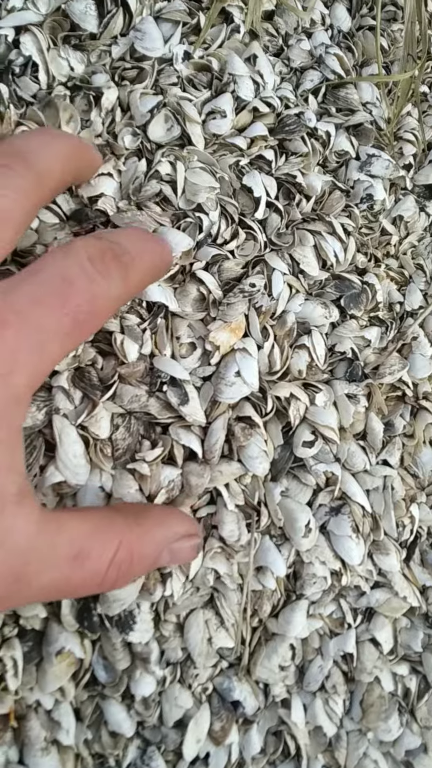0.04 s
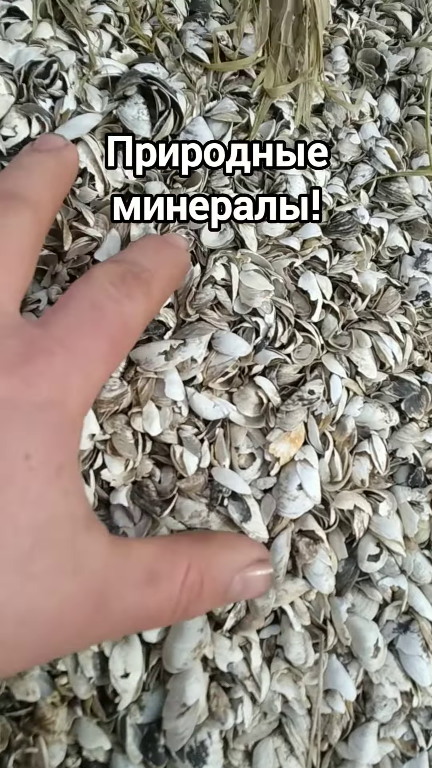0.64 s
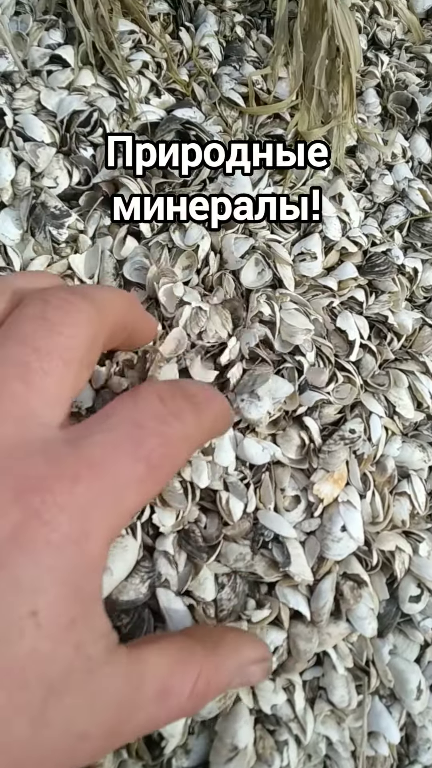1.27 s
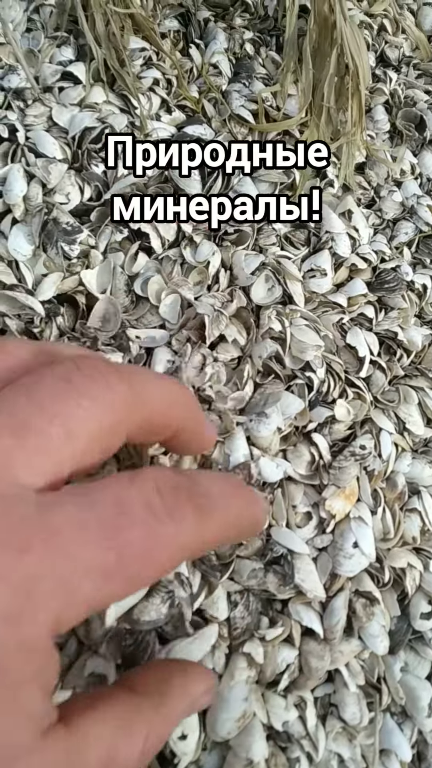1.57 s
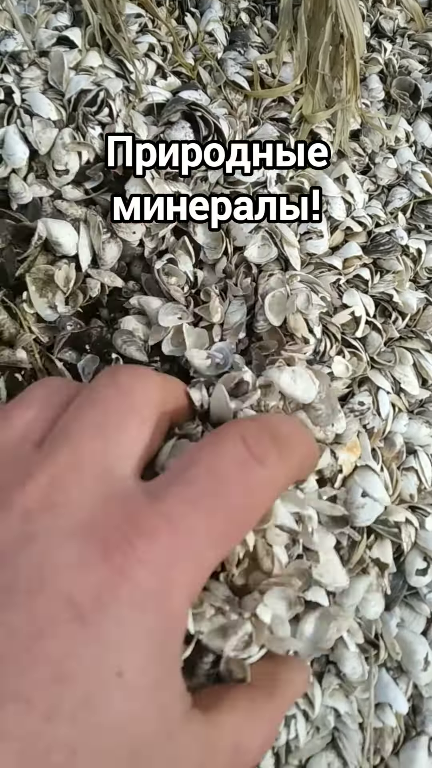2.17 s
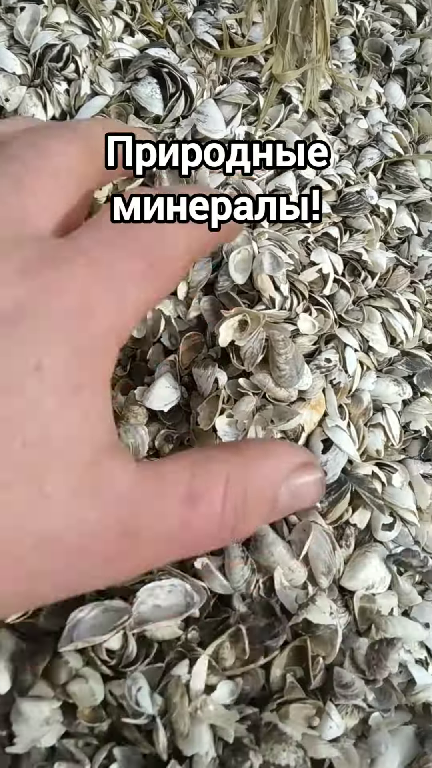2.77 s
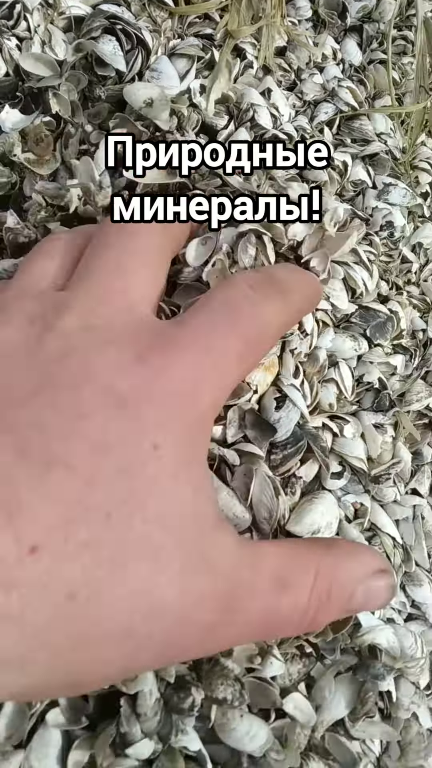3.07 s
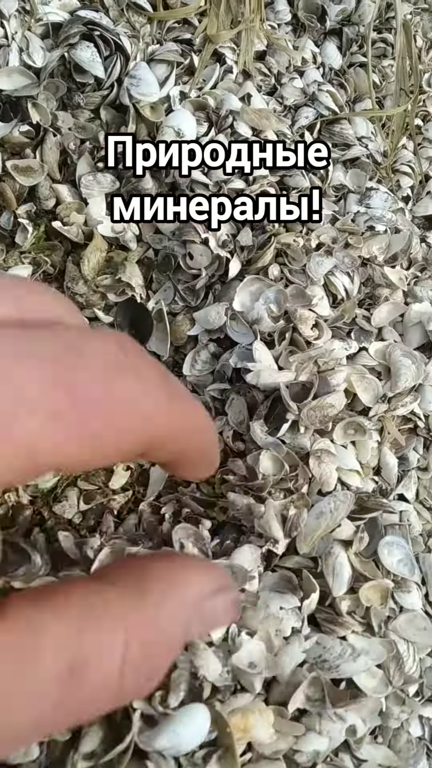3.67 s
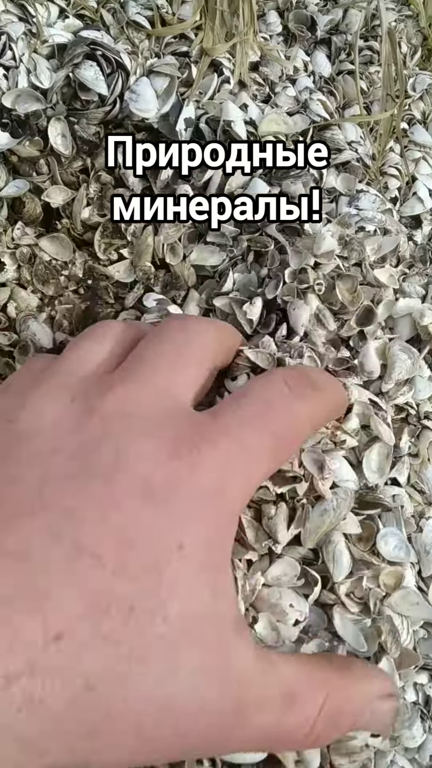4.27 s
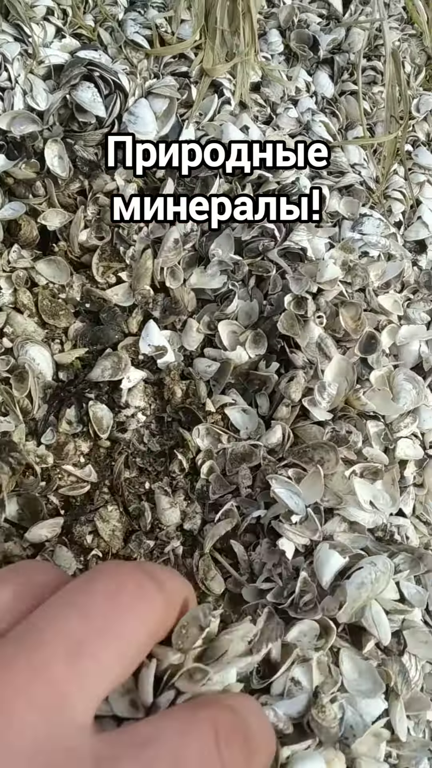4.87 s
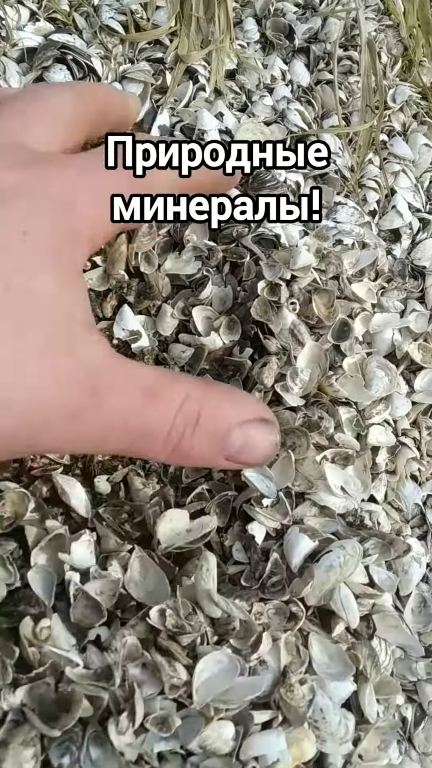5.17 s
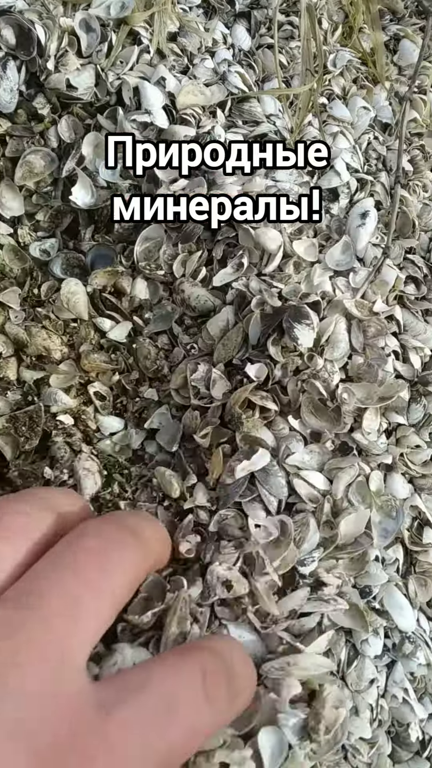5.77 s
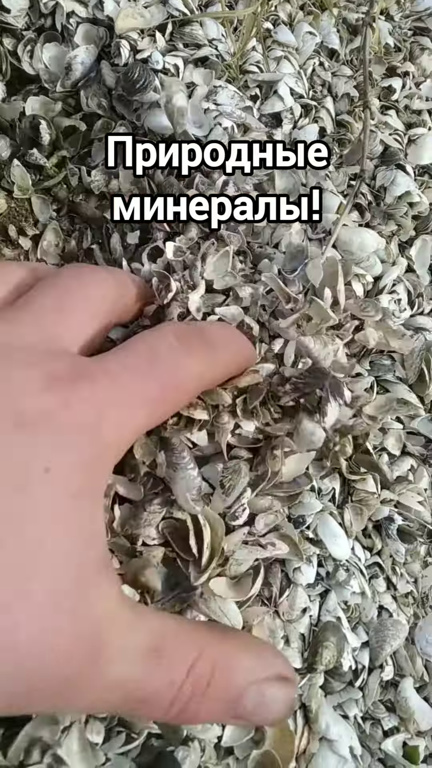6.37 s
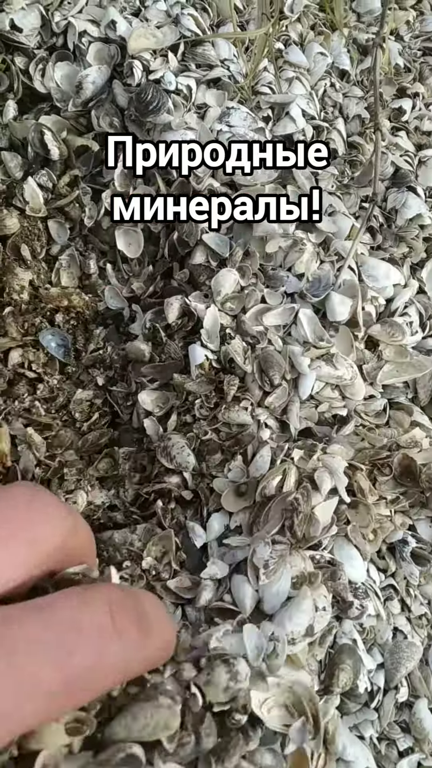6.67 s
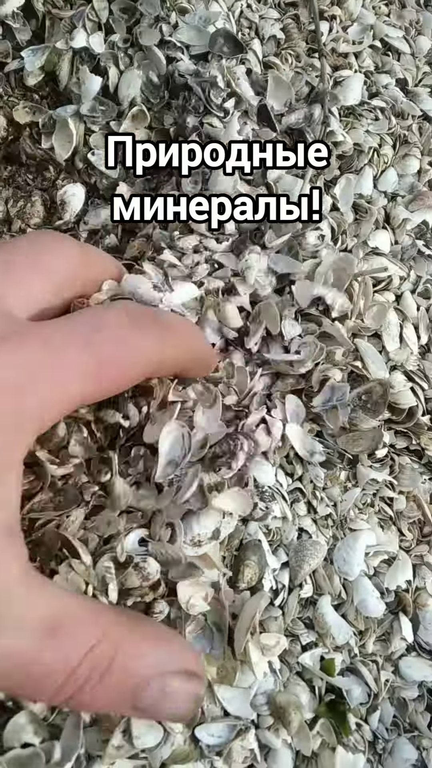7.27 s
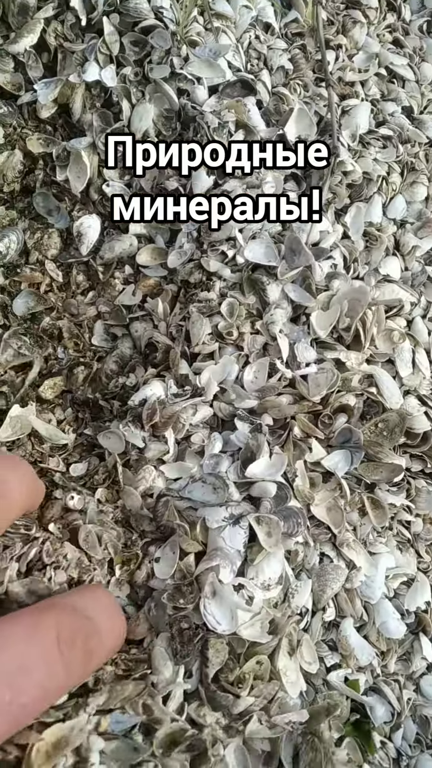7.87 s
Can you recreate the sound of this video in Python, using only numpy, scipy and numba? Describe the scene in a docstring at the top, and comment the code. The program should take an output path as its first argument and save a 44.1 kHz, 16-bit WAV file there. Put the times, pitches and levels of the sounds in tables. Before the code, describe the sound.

A hand rakes repeatedly through small dry shells, making a bright, close rattle and crunch, with a light breeze on the microphone.

```python
"""A bright, dry rattle: a hand rakes again and again through a bank of small shells, just under a phone.
Each stroke bites in, eases off and leaves a spill, ending towards the left microphone. Thousands of tiny
contacts ring the thin shells; a few snap loudly, hollow ones knock, the bed crunches as fingers dig in.
We are outdoors: a light breeze rumbles on the microphone ports, over a faint low hum and open air."""
import sys
import numpy as np
from scipy import signal
from scipy.fft import rfft, irfft
from scipy.io import wavfile
from scipy.ndimage import uniform_filter1d
from numba import njit

SR = 44100
rng = np.random.default_rng(int(sys.argv[2]) if len(sys.argv) > 2 else 0)


def log_audio(samples):
    """Write samples as a 16-bit WAV file to the path given in sys.argv[1]."""
    # one column per channel
    frames = np.atleast_2d(samples).T
    # limit to full scale, then quantise
    limited = np.clip(frames, -1, 1)
    pcm = np.round(limited * 32767).astype(np.int16)
    wavfile.write(sys.argv[1], SR, pcm)


N = 358974

# Strokes just under the phone. Levels, flow and pan are nominal: each layer scales them. +pan is left.
# start_s, length_s, dug_in_s, rattle_db, drift_db_per_s, clatter_db, bed_db, spill_db, flow_per_s,
# draw_left_s, pan_from_db, pan_to_db
STROKES = [(-0.02, .315, 0.38, -33, -17.5, -40.5, -58.5, -50, 2400, 0.44, 4.5, 17),
           (0.524, 1.13, 1.04, -38, 5, -39.5, -55, -47, 1600, 1.02, 0.5, 5.2),
           (1.768, 1.0, 0.4, -24, -7.5, -34, -51.5, -35, 8000, 0.89, 0.5, 12.8),
           (2.913, .875, 0.5, -21.5, -10, -38.5, -51, -34, 8500, 0.73, 0, 16),
           (3.937, .44, 0.4, -19, -28.5, -35, -48.5, -35, 8000, 0.34, 0.5, 3.2),
           (4.40, .72, 0.35, -30, 2.5, -37, -50.5, -31, 6500, 0.51, 4, 12.6),
           (5.186, .87, 0.57, -23.5, -4.5, -35, -49, -31, 8000, 0.752, 0.5, 11.2),
           (6.187, .615, 0.46, -22.5, -11.5, -33.5, -48, -30, 8500, 0.52, -0.5, 14.7),
           (7.05, .765, 0.46, -24, -3, -35.5, -45, -30, 8500, 0.68, 1.5, 9.2),
           (7.814, .33, 0.4, -36.5, 17, -40, -52.5, -33, 4500, 0.21, 7.5, 7.4)]
# Clumps giving way around the hand: start_s, length_s, rattle_db, clatter_db
SLIDES = [(0.109, .035, -35, -57.5), (0.152, 0.047, -36.5, -64), (0.312, .16, -49, -47.5),
          (0.475, .05, -38, -43), (0.537, .025, -37, -50), (0.62, .08, -32, -41), (0.7, .07, -33.5, -43),
          (0.858, .13, -30.5, -46), (0.905, .03, -28, -36), (1.004, 0.05, -26, -37),
          (1.054, 0.074, -29.5, -59), (1.166, 0.027, -27.5, -34), (1.212, .05, -27, -39),
          (1.27, 0.036, -27, -37), (1.394, .06, -32.5, -38), (1.439, .04, -31, -45),
          (1.474, .045, -23.5, -47), (1.533, 0.056, -31, -57), (1.767, .03, -29, -39),
          (1.858, 0.077, -21, -41), (2.014, .06, -22, -31.5), (2.096, 0.077, -25, -34),
          (2.442, .22, -27.5, -61), (2.511, 0.067, -24.5, -60), (2.687, .07, -31.5, -62),
          (2.82, .05, -30.5, -48), (2.862, .07, -36, -44), (2.912, .025, -30, -29), (2.98, 0.04, -24, -29),
          (3.05, 0.12, -25, -34), (3.367, 0.11, -27.5, -41), (3.558, 0.07, -30, -42),
          (3.841, 0.12, -34, -42.5), (4.09, 0.027, -22.5, -38), (4.27, 0.045, -27, -47),
          (4.646, .075, -28, -49), (4.727, 0.088, -24.5, -35), (4.805, .09, -26.5, -50),
          (5.017, 0.066, -28.5, -55), (5.146, 0.07, -31, -59), (5.217, 0.1, -23.5, -41),
          (5.374, 0.073, -28, -39), (5.534, 0.075, -30, -34), (5.731, 0.16, -26.5, -37),
          (5.987, 0.063, -33.5, -53), (6.127, .07, -27, -39.5), (6.227, 0.11, -23.5, -30),
          (6.458, 0.2, -27.5, -33.5), (6.853, .06, -30.5, -37), (6.935, .14, -33, -39.5),
          (7.118, 0.13, -26, -33.5), (7.296, 0.17, -29, -35.5), (7.706, 0.17, -27.5, -46),
          (7.882, 0.075, -25, -52), (8.01, 0.055, -24.5, -44), (8.111, .04, -26, -42)]
def hand(bite_s=.05, settle_s=.025, lift_s=.1, spill_s=.45, ease_db_per_s=5.5):
    """Strokes bite in, ease off, lift and leave a spill. Gives three layer levels (dB), flow and pan."""
    t, along = np.arange(N) / SR, np.linspace(0, 1, 12)
    slides = swells([(s, length, db) for s, length, db, _ in SLIDES], rise_s=.015, fall_s=.04)
    clatter = swells([(s, length, db) for s, length, _, db in SLIDES], rise_s=.015, fall_s=.04)
    rattle, bed, path = slides + undb(-49) ** 2, 0, []
    flow = 500 + 2000 * np.sqrt(slides) / undb(-28)
    for (start, length, dug_s, rattle_db, drift, clatter_db, bed_db, spill_db,
         rate, draw_s, from_db, to_db) in STROKES:
        age, after = np.clip(t - start, 0, length), np.maximum(t - start - length, 0)
        moving = np.minimum(age / bite_s, 1) * np.exp(-np.minimum(after, 1) / settle_s)
        buried = moving * np.exp(-np.maximum(age - dug_s, 0) / lift_s) * undb(-ease_db_per_s * age)
        # shells trickle back into the furrow
        spill = undb(spill_db) * np.minimum(after / settle_s, 1) * np.exp(-after / spill_s)
        rattle = rattle + (moving * undb(rattle_db + drift * age)) ** 2 + spill ** 2
        clatter = clatter + (buried * undb(clatter_db)) ** 2
        bed = bed + (buried * undb(bed_db)) ** 2
        flow = flow + rate * moving + 4200 * spill / undb(-30)
        pan_db = from_db + (to_db - from_db) * along ** 2.13  # faster near the left microphone
        path += [*zip(start + draw_s * along, pan_db), (start + length, to_db)]
    # the surface rattle also stirs the layers below
    powers = [rattle, clatter + rattle * undb(-25.5) ** 2, bed + rattle * undb(-34) ** 2]
    stumble_db = .72 * walk(25)  # the fingers advance unevenly
    return 10 * np.log10(powers) + stumble_db, flow, curve(sorted(path))[0]


def raking():
    """Shells give way in small avalanches: rattle on top, larger shells below, the bed underneath."""
    (rattle_db, clatter_db, bed_db), flow, pan_db = hand()
    flow = np.clip(flow, 50, 9000)
    steady = (flow / 3000) ** 1.3  # the fewer shells move, the more single slips stand out
    slips = avalanches(rate=190, rise_ms=.6, decay_ms=.9, spread=1.4)
    jerk = np.sqrt((slips + steady) / (1 + steady))
    wet_db = 1 + 7 * np.log10(flow / 5000)  # a light touch is dry; a buried hand is ringed by shells
    lag_ms = .16 - .0309 * pan_db  # the left microphone's lag shrinks as the hand draws left
    rattle = surface_rattle(flow, jerk, lag_ms, wet_db) * undb(rattle_db + 3)
    clatter = large_shells(flow, jerk, lag_ms, wet_db - 2) * undb(clatter_db)
    bed = shell_bed(flow, jerk, lag_ms) * undb(bed_db)
    return phone_shadow(rattle, pan_db) + clatter * sides(.5 * pan_db) + bed * sides(.13 * pan_db)


# Tone of the small shells at close range: frequency_hz, gain_db
SHELL_COLOUR = [(300, -38.5), (1000, -32), (2000, -22.5), (3200, -19.5), (4200, -18.5), (5200, -14),
                (6300, -9), (7500, -4), (9000, -7), (11000, -7.5), (13500, -7.5), (16000, -8.5)]
def surface_rattle(flow, jerk, lag_ms, wet_db):
    """Thin shells jostle, loose ones clink, and rims chip off with hard, dry ticks."""
    rattle = contacts(2 * flow, 3500, 16500, decay_ms=.13, lag_ms=lag_ms, jitter_ms=.07, beam_db=4)
    accent = undb(-12) * np.sqrt(flow / 7000)
    loose = accent * even(clinks(flow, 3400, 9500, decay_ms=2.8), span_s=.4)
    chips = contacts(flow / 70, 4000, 13000, decay_ms=.05, lag_ms=lag_ms, jitter_ms=.07, beam_db=3,
                     count=2000)
    rattle = scatter(even(rattle * jerk, span_s=.14) + loose, decay_ms=5.5, wet_db=wet_db)
    rattle += accent * even(chips, span_s=.4)
    return even(colour(rattle, SHELL_COLOUR), span_s=.028)


# Single shells snapping close to the microphones: time_s, relative_db, pitch_hz, pan_db, skid_ms
SNAPS = [(.0235, -13, 10300, 0, 1.8), (.1097, -7.5, 11100, 10, .9), (.1284, -5.5, 7290, 3, .7),
         (.209, -10.5, 11300, 10, 1.3), (.2176, -17, 13900, 14, .6), (.2522, -20, 10600, 10, .8),
         (.2934, -19, 9000, 10, 1.4), (.3219, -22, 9130, 14, .8), (.3475, -25, 10000, 12, 1),
         (.413, -26, 9500, 12, 1.2), (.3407, -22, 10500, 14, 1.2), (.3565, -23, 9000, 13, 1.5),
         (.3691, -17, 7140, 12, .7), (.3903, -13.5, 12000, 14, .5), (.4007, -13, 10800, 14, .7),
         (.4366, -27, 11500, 10, 2.2), (.4485, -23, 10400, 12, 3), (.476, -24, 9850, -1.5, 2),
         (.4857, -20, 6380, 0, 1.8), (.5033, -20, 8440, -6, .9), (.5273, -15, 8200, 12, .7),
         (.5324, -7, 6060, -7, .8), (.568, -24, 7000, 0, 2), (.5774, -20, 13500, 5, .8),
         (.5976, -14, 6430, 5, 1), (.614, -14, 8300, -1, 1.5), (.6261, -15, 7590, 0, 2.7),
         (.708, -15, 7770, -2.5, 1.2), (.7337, -14, 9500, -7, 1.3), (.7545, -13, 8860, -2, 1.5),
         (.805, -16, 7470, 0, 1.5), (.8285, -15, 7960, 2, 2.6), (.8614, -18, 7760, 1.5, 1.5),
         (.9163, -11, 7700, -1, 2.3), (.988, -13, 8110, -1, 1.7), (1.0214, -11, 7880, -2, 2.3),
         (1.0321, -10, 8600, -2, 1.8), (1.0668, -13, 7400, 0, 2.2), (1.1107, -14, 8200, 0, 2.3),
         (1.1543, -11, 8140, 1, 1.7), (1.1718, -10, 8500, 2, 3.4), (1.1821, -13.5, 8300, 1, 1.6),
         (1.2201, -9, 13600, 0, 1.4), (1.2381, -9, 8140, -2, 1.8), (1.2905, -11, 8060, -1, 1.6),
         (1.2992, -12, 7500, -2, 3.2), (1.3311, -17, 7320, 9, .8), (1.3412, -17, 8800, 3, 1.3),
         (1.3543, -15, 9400, 5, 1.2), (1.3754, -12, 7680, 10, 1.5), (1.3932, -15, 8400, 10, 1.2),
         (1.4648, -9, 12500, 1, 1.1), (1.5883, -13, 9000, 6, 1.1), (1.669, -12, 8620, 8, 1.3),
         (1.6776, -18, 9800, 12, 1.2), (1.6888, -17, 7900, 11, 1.9), (1.7363, -12.5, 7450, 11, .8),
         (1.7774, -17, 6730, 0, 2.5), (1.7863, -15, 7210, -.5, 2), (2.2926, -10, 8300, 1, 1.3),
         (2.3658, -13, 7200, 9, 2.1), (2.4424, -10, 9800, 14, .7), (2.7641, -14, 13900, 14, .7),
         (2.7826, -17, 9500, 14, 1.7), (2.8489, -13, 8280, 0, 2.2), (2.9196, -9, 8150, 0, 1.6),
         (2.9326, -9, 8040, -1, 1.6), (2.9442, -8, 8380, -3, 1.1), (3.5644, -13, 6900, 7.5, 1.4),
         (3.574, -11, 6740, 9, 1.3), (3.5877, -9, 11000, 6.5, 1.1), (3.641, -14, 7700, 12, 1.3),
         (3.7112, -14, 9900, 14, .8), (3.7334, -15, 8800, 14, 1.8), (3.7884, -15, 7300, 12, 1.3),
         (3.7933, -13, 14200, 14, .7), (3.9524, -9.5, 15000, -2, 1.6), (3.9731, -8, 7200, -1, 1.7),
         (4.3627, -14, 7800, -1, 1.6), (4.5056, -11, 13000, 4, 1.5), (4.5358, -12, 8000, 0, 1.8),
         (4.616, -11, 12060, 8, .8), (4.6508, -8, 6800, 0, 1.4), (4.665, -10, 14600, 2, 2.5),
         (4.7007, -9, 13260, 6, .8), (4.8498, -10, 11300, 14, 1.7), (4.9, -10, 7360, 14, 1.5),
         (4.9698, -13, 8200, 11, 1.9), (5.0267, -9, 10600, 14, 1.5), (5.1455, -6.5, 7550, 6, 1.3),
         (5.161, -11, 11400, 11, 1.4), (5.9462, -11, 7100, 13, 1.1), (5.9727, -10, 8600, 9, 1.4),
         (6.0428, -10, 7900, 8, 1.3), (6.1062, -15, 9000, 9, 1.2), (6.1315, -8.5, 12400, 10, 1.4),
         (6.1812, -10, 8300, 0, 1.1), (6.6117, -9, 7750, 6, .8), (6.6684, -11, 14300, 14, .7),
         (6.7062, -13, 8100, 13, .8), (6.7668, -13, 8270, 14, .8), (6.7799, -13, 7200, 13, 1.5),
         (6.8742, -7, 7810, 9, 1.5), (7.211, -7, 7850, 0, 1.8), (7.3135, -11, 8000, 0, .8),
         (7.4618, -7.5, 7060, 3, .8), (7.57, -10, 11540, 13, .8), (7.7485, -7, 12100, 11, 1.7),
         (7.7938, -11, 7600, 9, 1.6), (7.8514, -10, 7850, 8, 2), (7.8755, -7, 8050, 7, 1.3),
         (7.9119, -11, 7380, 5.5, 1.5), (7.9497, -9, 8400, 5, 2.4), (8.0162, -10, 7580, 11, 1.3),
         (8.0549, -8, 12100, 9, 1.7), (8.0745, -10, 7370, 8, 1.5)]
def snaps(ring_ms=.3, catch_gap_ms=.4, size=600):
    """A shell edge skids and catches again and again; each catch ticks and briefly rings the shell."""
    out, t_ms = np.zeros((2, N + 2 * size)), (np.arange(size) - size // 2) / SR * 1000
    tone = lambda age, hz, ms: np.exp(-age / ms) * np.sin(2 * np.pi * hz * age / 1000)
    for s, db, hz, pan_db, skid_ms in SNAPS:
        snap, count = 0, max(int(skid_ms / catch_gap_ms), 2)
        lag_ms = np.array([[.16 - .03 * pan_db], [0]])
        for catch_ms in skid_ms * (np.linspace(-.4, .4, count) + .1 * rng.standard_normal(count)):
            age = np.maximum(t_ms - catch_ms - lag_ms, 0)
            tick = undb(4) * tone(age, rng.uniform(4000, 15500, (2, 1)), ms=.13)
            force = undb(3 * rng.standard_normal())
            snap = snap + force * (tone(age, hz * rng.uniform(.92, 1.08), ring_ms) + tick)
        snap *= np.sqrt((skid_ms + ring_ms) / 1000 * SR / np.sum(snap ** 2, axis=1, keepdims=True))
        first = int((s + .0011) * SR) - size // 2
        out[:, first:first + size] += undb(db - .7) * snap * sides(pan_db)[:, None]
    return colour(scatter(out[:, :N], decay_ms=2.5, wet_db=-15), SHELL_COLOUR)


# Tone of the larger shells just below the surface: frequency_hz, gain_db
CLATTER_COLOUR = [(400, -2), (900, -2.5), (1250, -6.5), (1800, -3.5), (2400, 0.5), (3200, 3), (4300, 2.5),
                  (5500, 14.5), (8000, 21.5)]
def large_shells(flow, jerk, lag_ms, wet_db):
    """Larger shells clatter lower and ring longer than the small ones."""
    clatter = contacts(flow, 1153, 5370, decay_ms=.55, lag_ms=lag_ms, jitter_ms=.02, beam_db=2.5)
    clatter = scatter(clatter * jerk, decay_ms=5.5, wet_db=wet_db)
    return even(colour(clatter, CLATTER_COLOUR), span_s=.035)


# Tone of the bed under the fingers: frequency_hz, gain_db
BED_COLOUR = [(60, 5), (150, 2.5), (260, 0.5), (400, -5.5), (600, -0.5), (900, -6.5), (1400, -7.5),
              (3000, -18.5)]
def shell_bed(flow, jerk, lag_ms):
    """The packed bed shifts in sparser, dull contacts."""
    bed = contacts(.2 * flow, 137, 1305, decay_ms=1.42, lag_ms=lag_ms, jitter_ms=.2, beam_db=1)
    return even(colour(bed * jerk, BED_COLOUR), span_s=.065)


# Hollow shells, centred between the microphones: time_s, relative_db, pitch_hz
KNOCKS = [(.055, -29, 668), (.0803, -33, 2370), (.128, -26, 5270), (.1944, -26.5, 2410), (0.596, -32, 643),
          (0.6754, -25, 2410), (1.2239, -24, 5520), (1.373, -24, 590), (1.392, -28, 690),
          (1.401, -24.5, 630), (1.416, -36, 740), (1.689, -32.5, 1810), (1.7876, -24, 4690),
          (2.1517, -21, 4700), (3.752, -31.5, 1950), (4.664, -24, 5470), (5.063, -33, 1940),
          (5.066, -32, 1900), (6.9455, -29, 1700), (7.0055, -34, 1880), (7.398, -25, 910),
          (7.813, -20, 4740), (7.9473, -24, 5170)]
def knocks():
    """Hollow shells knock together and are soon damped by the bed, the small ones soonest."""
    s, db, hz = np.transpose(KNOCKS)
    knock = rings(s + .0008, undb(db - 1), hz, decay_s=.0011 * (1000 / hz) ** .2)
    return scatter(np.array([knock, knock]), decay_ms=4.3, wet_db=-5)


# The bed collapsing under a fingertip, centred: start_s, length_s, level_db, pitch_hz
CRUNCHES = [(0.043, 0.027, -46, 450), (1.17, 0.18, -51, 640), (1.365, .09, -47.5, 600),
            (3.981, 0.13, -50, 1050), (5.64, 0.21, -49, 520), (6.239, 0.12, -50, 1160),
            (6.469, .16, -49, 520), (7.125, 0.087, -45, 1160), (7.797, .2, -53.5, 654)]
def crunches(grains_per_s=700, decay_ms=.96, spread_octaves=.3):
    """Buried shells give way in a burst of dull grains scattered round one pitch."""
    out = np.zeros(N)
    for s, length, db, hz in CRUNCHES:
        count = max(int(grains_per_s * length), 4)
        size, detune = rng.standard_normal((400, 2))[:count].T
        start = s + length * rng.random(400)[:count]
        pitch_hz = hz * 2 ** (spread_octaves * detune)
        burst = rings(start, undb(4 * size), pitch_hz, np.full(count, decay_ms / 1000))
        out += undb(db) * burst * np.sqrt(length * SR / np.sum(burst ** 2))
    return scatter(np.array([out, out]), decay_ms=3, wet_db=-6)


# Wind right on the ports, as steady breeze, smaller eddies and buffeting: frequency_hz, gain_db
BREEZE_COLOUR = [(10, -4.5), (25, -1), (42, -1.5), (65, -12.5), (100, -24), (160, -32), (300, -40),
                 (800, -28.5), (3000, -49)]
GUST_COLOUR = [(10, -10.5), (25, -1), (42, -2.5), (65, -7), (100, -13), (160, -26.5), (300, -42),
               (800, -60), (3000, -75)]
BUFFET_COLOUR = [(30, -5), (110, -1), (220, -6), (400, -27), (1000, -45), (3000, -68)]
# Gusts reaching the phone: start_s, length_s, relative_db
GUSTS = [(2.6, 0.21, -41), (2.82, 0.25, -34.5), (3.66, 0.22, -46.5), (4.1, 0.84, -48.5), (5.63, 0.21, -40),
         (6.0, 0.13, -43), (7.27, 0.21, -45), (7.6, 0.089, -38)]
def breeze():
    """Turbulence rumbles on each port separately, more on the left; stronger gusts reach higher."""
    steady, eddies, buffet = (even(colour(rng.standard_normal((2, N)), points), span_s=.075)
                              for points in (BREEZE_COLOUR, GUST_COLOUR, BUFFET_COLOUR))
    gust_power = swells(GUSTS, rise_s=.064, fall_s=.064) * undb(3 * walk(28) + 5) ** 2
    rumble = steady * undb(-49 + .73 * walk(17)) + eddies * np.sqrt(gust_power)
    buffet *= undb(-42.5) * gust_power / gust_power.max()
    return (rumble + buffet) * sides(12)[:, None]


# A low hum in the background, sinking in pitch: time_s, pitch_hz, level_db
HUM = [(0, 90.5, -60.5), (.5, 86.3, -55), (1.8, 82.4, -56.5), (2.4, 78.9, -59), (4.2, 77.56, -56.5),
       (5.2, 77.2, -57.5), (6.2, 77.6, -60), (8.14, 77.9, -80)]
# Open air all around: frequency_hz, gain_db
AIR_COLOUR = [(40, 6.5), (160, -6), (300, -14), (700, -22.5), (1500, -18.5), (5000, -46), (16000, -62)]
def outdoors():
    """A faint wavering hum with its octave, over soft open air."""
    hz, db = curve(HUM)
    phase = 2 * np.pi * np.cumsum(hz * (1 + .0021 * walk(11))) / SR
    hum = np.sqrt(2) * undb(db + 1.5 * walk(6)) * (np.sin(phase) + undb(-10) * np.sin(2 * phase))
    air = colour(rng.standard_normal(N) + 1.1 * rng.standard_normal((2, N)), AIR_COLOUR)
    return hum + undb(-51.5) * air / np.sqrt(np.mean(air ** 2))


def contacts(flow, low_hz, high_hz, decay_ms, lag_ms, jitter_ms, beam_db, count=130000):
    """Random shell contacts, flow per second, each with its own size, pitch, ring and path to the ports."""
    chance, normal = rng.random((count, 3)).T, rng.standard_normal((count, 4)).T
    t = np.arange(N) / SR
    due = np.cumsum(-np.log(1 - chance[0]))
    start = np.interp(due, np.cumsum(flow) / SR, t, right=2 * N / SR)
    size = np.sign(chance[2] - .5) * undb(5 * np.minimum(normal[0], 1.9))
    hz = low_hz + (high_hz - low_hz) * chance[1]
    decay_s = decay_ms / 1000 * np.exp(.7 * np.minimum(normal[1], 2))  # wedged shells stop at once
    lag_s = (np.interp(start, t, lag_ms) + jitter_ms * normal[2]) / 1000
    left, right = size * sides(beam_db * normal[3])  # a curved shell beams its sound unevenly
    ports = [rings(start + lag_s, left, hz, decay_s), rings(start, right, hz, decay_s)]
    return np.array(ports) / np.sqrt(flow)


def clinks(flow, low_hz, high_hz, decay_ms, bounce_ms=8, count=900):
    """Loose shells tumble and ring freely, each bouncing three times on its own pitch."""
    chance, normal = rng.random((count, 3)).T, rng.standard_normal((count, 3)).T
    busy = np.cumsum(flow)
    start = np.interp(chance[0], busy / busy[-1], np.arange(N) / SR)
    hz = low_hz * (high_hz / low_hz) ** chance[1]
    size = undb(3.5 * np.minimum(normal[0], 1.6))
    decay_s = decay_ms / 1000 * np.exp(.35 * normal[1])
    gap_s = bounce_ms / 1000 * (.5 + chance[2])
    return np.array([sum(rings(start + k * gap_s, size * gain * .7 ** k, hz, decay_s) for k in range(3))
                     for gain in sides(5 * normal[2])])


def avalanches(rate, rise_ms, decay_ms, spread, count=2500):
    """Brief slips of random size that build up and die away; mean 1."""
    wait, size = -np.log(1 - rng.random((count, 2)).T)
    start = np.minimum(np.cumsum(wait) / rate * SR, N).astype(int)
    kicks = np.bincount(start, np.minimum(size, 4) ** spread, N + 1)[:N]
    fade = lambda x, ms: signal.lfilter([1], [1, -np.exp(-1000 / (ms * SR))], x)
    slips = fade(fade(kicks[::-1], rise_ms)[::-1], decay_ms)
    return slips / slips.mean()


def scatter(x, decay_ms, wet_db, size=4096):
    """The hand and nearby shells return a short tail to each port; its paths change as the hand moves."""
    out, padded = np.zeros((2, N + 3 * size)), np.pad(x, ((0, 0), (size // 2, size)))
    fade = np.exp(-np.arange(size // 4) / SR * 1000 / decay_ms)
    window = signal.get_window("hann", size)
    for i in range(0, N, size // 2):
        tail = rng.standard_normal((2, size // 4)) * fade / np.sqrt(np.sum(fade ** 2))
        echo = signal.fftconvolve(padded[:, i:i + size] * window, tail, axes=1)
        out[:, i:i + echo.shape[1]] += echo
    return x + undb(wet_db) * out[:, size // 2:size // 2 + N]


def phone_shadow(x, pan_db):
    """The far port lies in the phone's shadow, most of all in the top treble."""
    low = signal.sosfiltfilt(signal.butter(2, 10000, fs=SR, output="sos"), x)
    return low * sides(.46 * pan_db) + (x - low) * sides(1.3 * pan_db)


@njit
def rings(start, size, hz, decay_s):
    """Sum of damped tones, each starting abruptly at its own time."""
    out = np.zeros(N)
    for k in range(len(start)):
        pole = (2j * np.pi * hz[k] - 1 / decay_s[k]) / SR
        first = int(start[k] * SR) + 1
        z, step = size[k] * np.exp(pole * (first - start[k] * SR)), np.exp(pole)
        for i in range(max(first, 0), min(first + int(6 * decay_s[k] * SR), N)):
            out[i] += z.imag
            z *= step
    return out


def swells(rows, rise_s, fall_s):
    """Summed power of (start_s, length_s, level_db) events that rise, hold and fade."""
    t = np.arange(N) / SR
    return sum((undb(db) * np.clip((t - s) / rise_s, 0, 1)
                * np.clip((s + length - t) / fall_s + .5, 0, 1)) ** 2 for s, length, db in rows)


def colour(x, points, size=8192):
    """Causal filter through (frequency_hz, gain_db) points."""
    hz, db = np.transpose(points)
    log_hz = np.log(np.fft.rfftfreq(size, 1 / SR) + 1)
    cepstrum = irfft(np.log(undb(np.interp(log_hz, np.log(hz), db))))
    cepstrum[1:size // 2] *= 2
    cepstrum[size // 2 + 1:] = 0
    return signal.oaconvolve(x, irfft(np.exp(rfft(cepstrum)))[None], axes=1)[:, :N]


def even(x, span_s):
    """Hold the running rms near 1, keeping detail shorter than the span."""
    size = int(span_s * SR)
    power = uniform_filter1d(uniform_filter1d(np.mean(x ** 2, axis=0), size), size)
    return x / np.sqrt(np.abs(power) + 1e-4 * power.mean())


def curve(rows):
    """Each column after the time, joined by straight lines, at every sample."""
    s, *columns = np.transpose(rows)
    return [np.interp(np.arange(N) / SR, s, c) for c in columns]


def walk(rate):
    """Random levels, a new one every 1 / rate s, joined by straight lines."""
    return np.interp(np.arange(N) / SR * rate, np.arange(N // 8), rng.standard_normal(N // 8))


def sides(pan_db):
    """Left and right gains of constant power; pan_db is left minus right."""
    gains = undb(np.array([pan_db, -pan_db]) / 2)
    return gains / np.sqrt(np.mean(gains ** 2, axis=0))


def undb(db):
    """Decibels to gain."""
    return 10 ** (np.asarray(db) / 20)


def scene():
    """Shells close under the two microphones, breeze on the ports, open air behind."""
    return raking() + snaps() + knocks() + crunches() + breeze() + outdoors()


def record(dry):
    """The phone rounds the sharpest peaks and cuts the top above 15.5 kHz."""
    rounded = .8 * np.tanh(dry / .8)
    return signal.sosfilt(signal.ellip(10, .2, 80, 15500, fs=SR, output="sos"), rounded)


dry = scene()
out = record(dry)
log_audio(out)
```